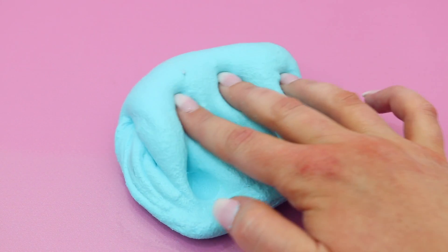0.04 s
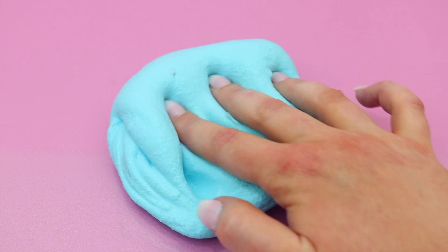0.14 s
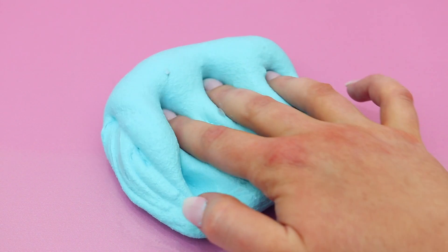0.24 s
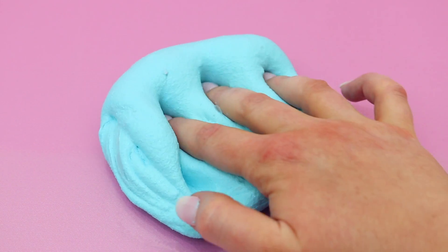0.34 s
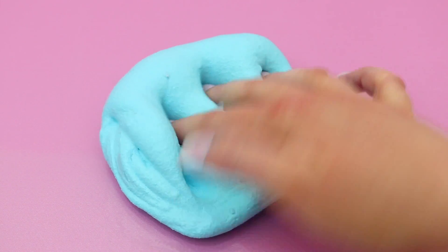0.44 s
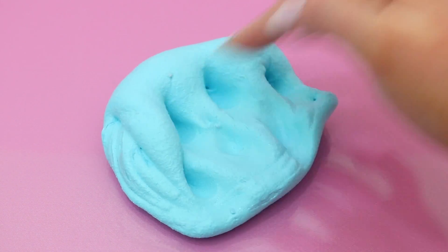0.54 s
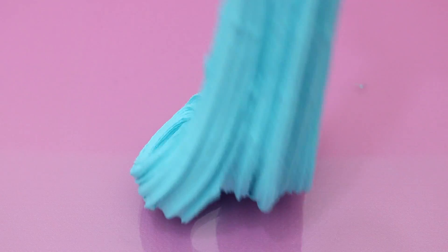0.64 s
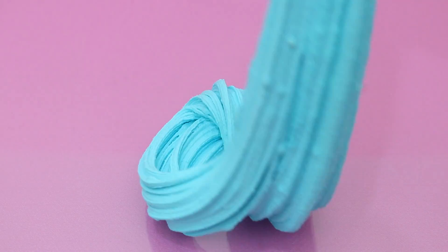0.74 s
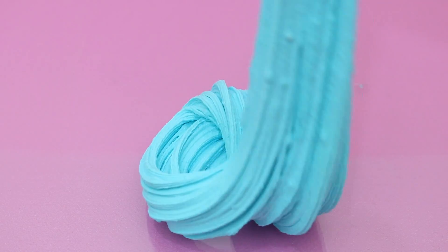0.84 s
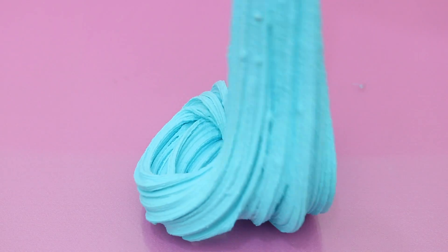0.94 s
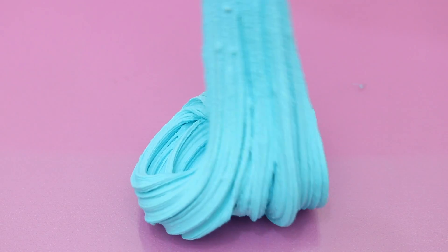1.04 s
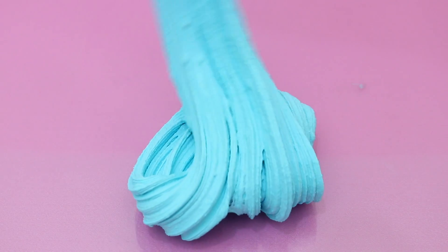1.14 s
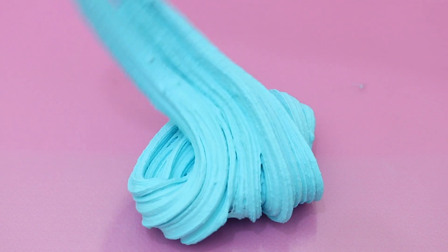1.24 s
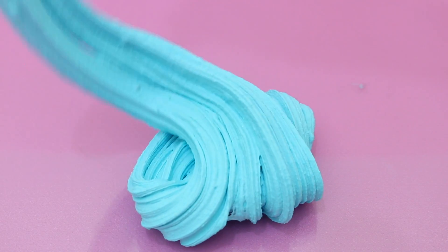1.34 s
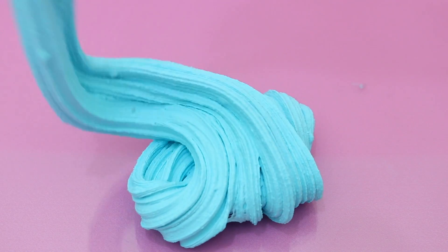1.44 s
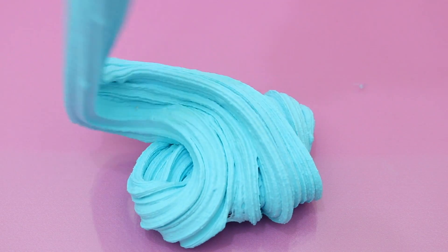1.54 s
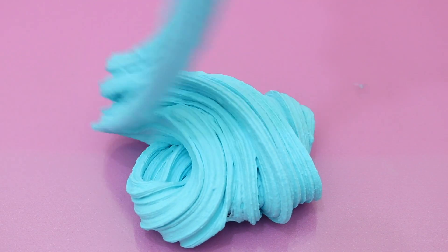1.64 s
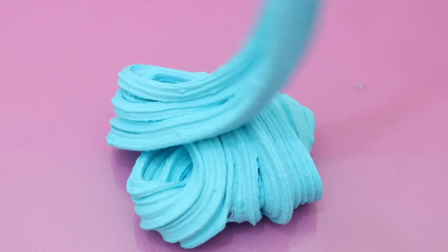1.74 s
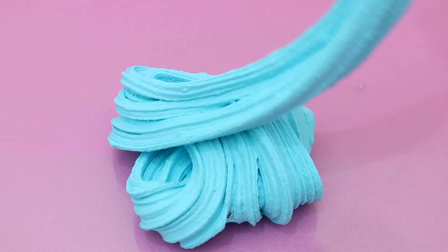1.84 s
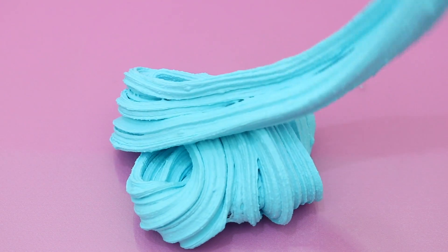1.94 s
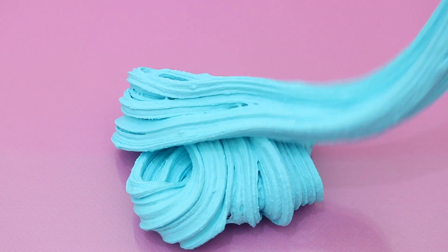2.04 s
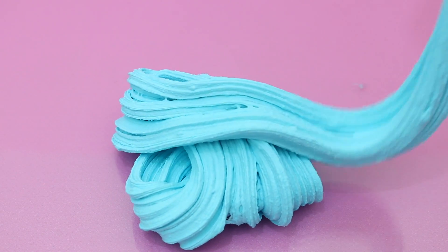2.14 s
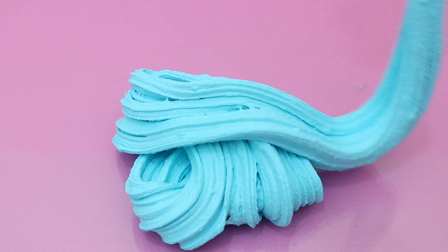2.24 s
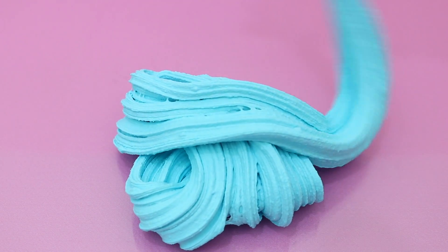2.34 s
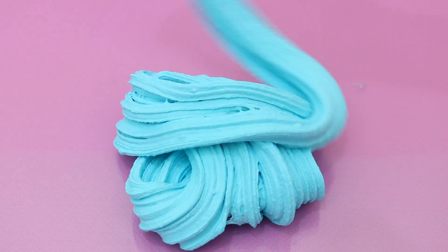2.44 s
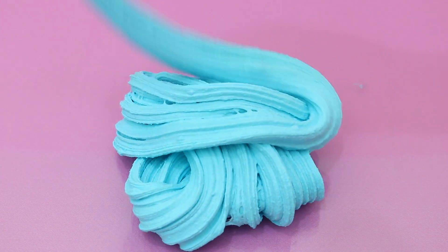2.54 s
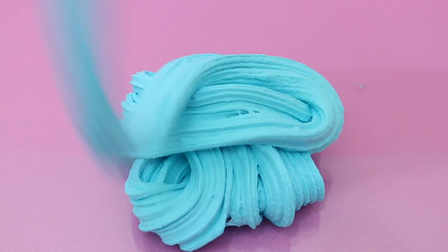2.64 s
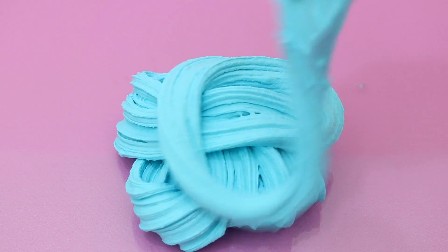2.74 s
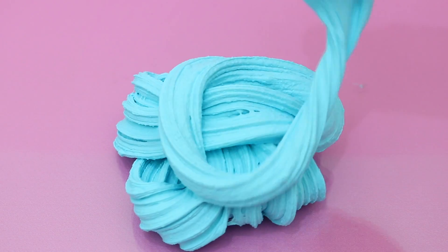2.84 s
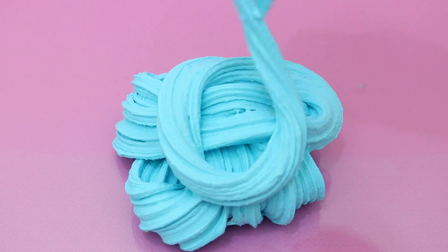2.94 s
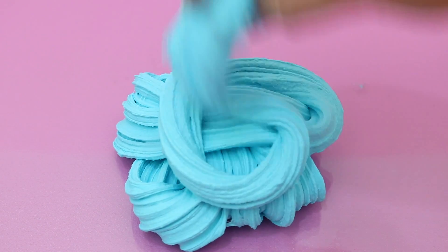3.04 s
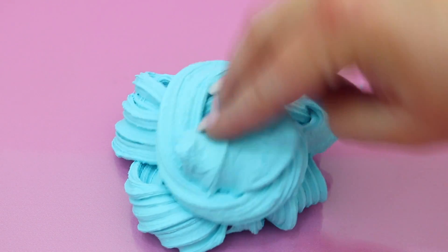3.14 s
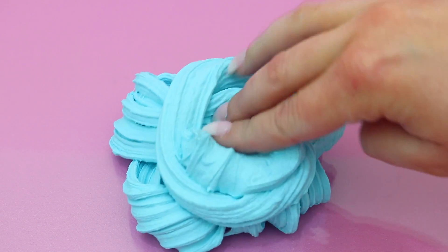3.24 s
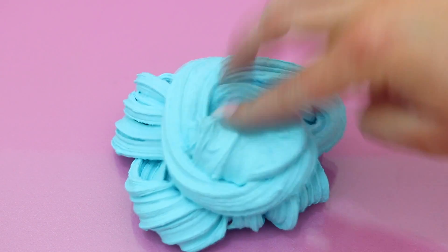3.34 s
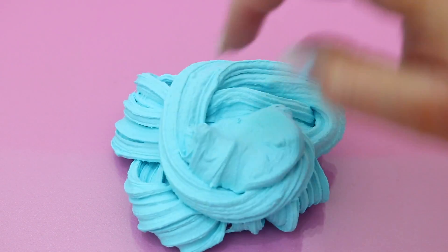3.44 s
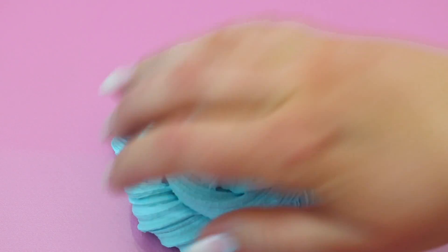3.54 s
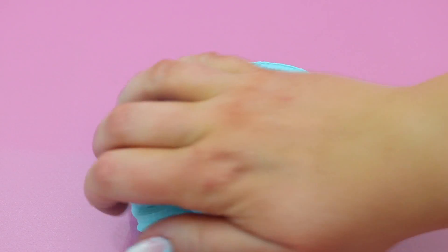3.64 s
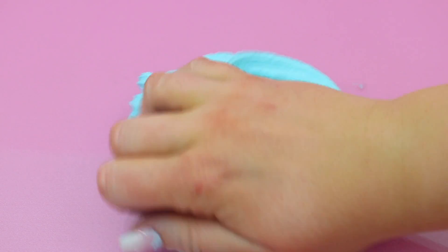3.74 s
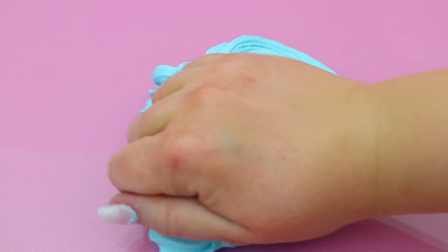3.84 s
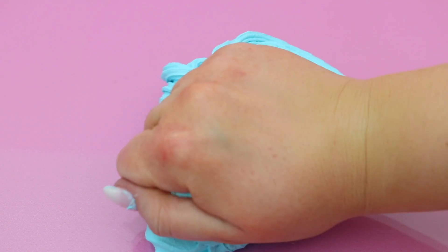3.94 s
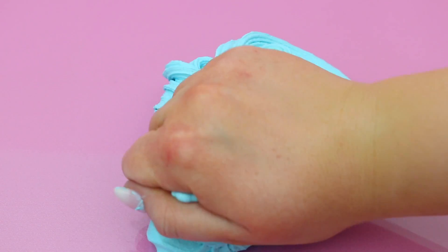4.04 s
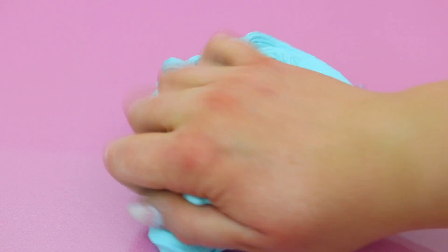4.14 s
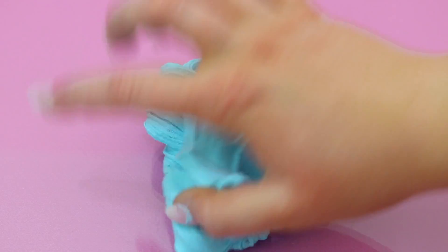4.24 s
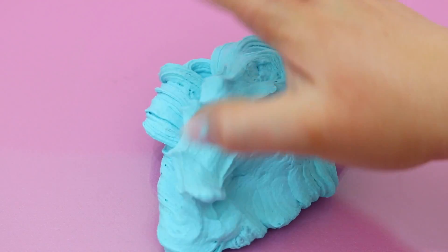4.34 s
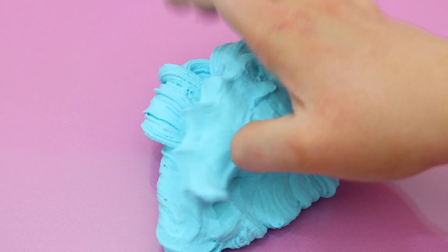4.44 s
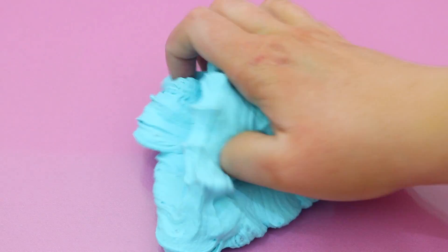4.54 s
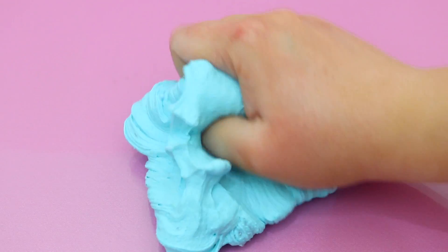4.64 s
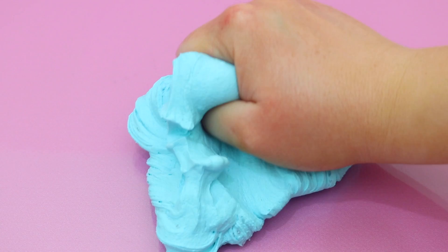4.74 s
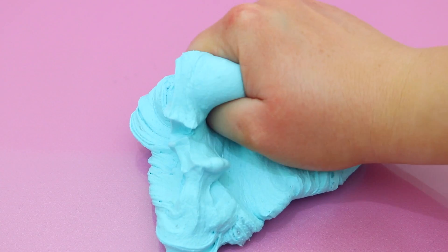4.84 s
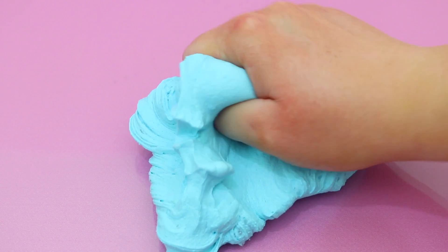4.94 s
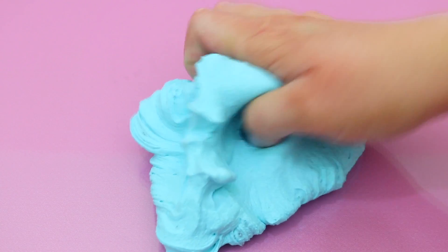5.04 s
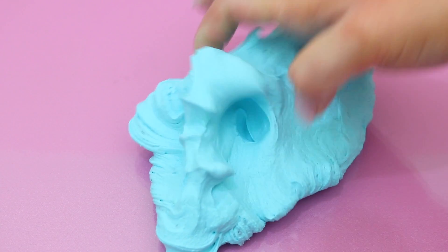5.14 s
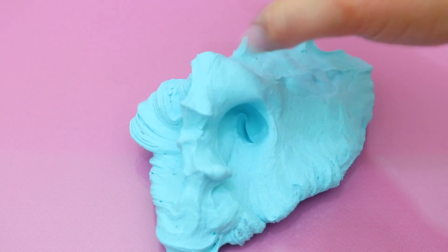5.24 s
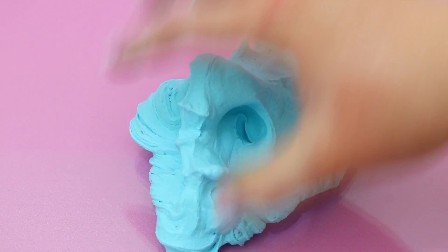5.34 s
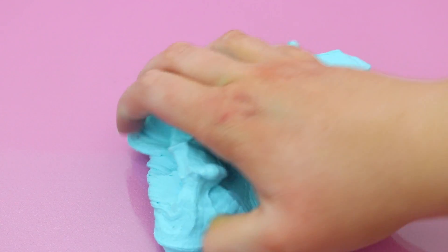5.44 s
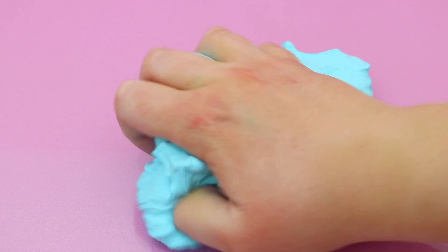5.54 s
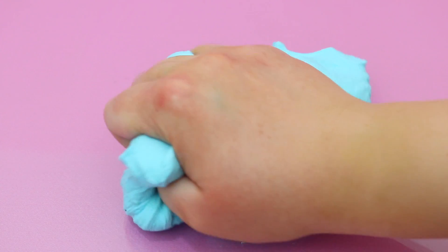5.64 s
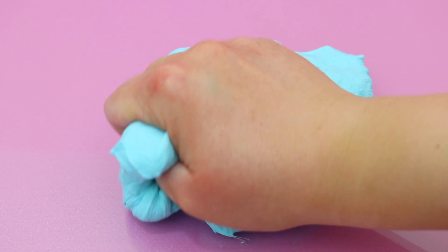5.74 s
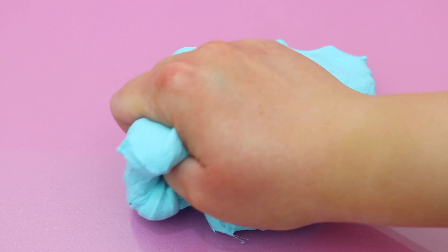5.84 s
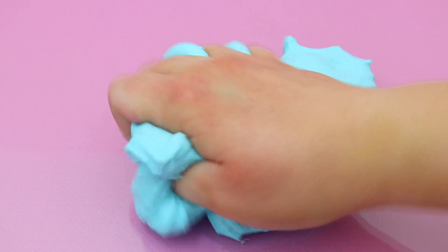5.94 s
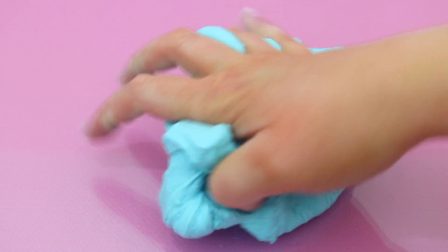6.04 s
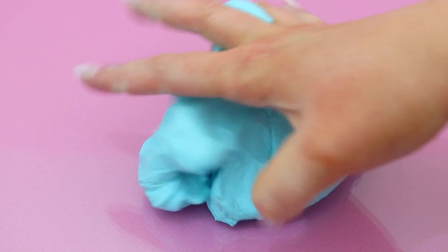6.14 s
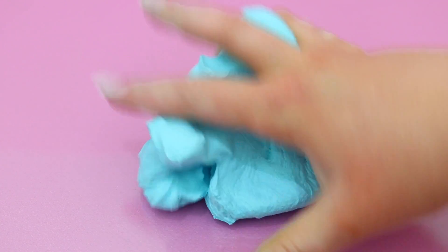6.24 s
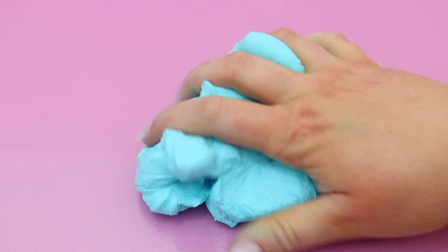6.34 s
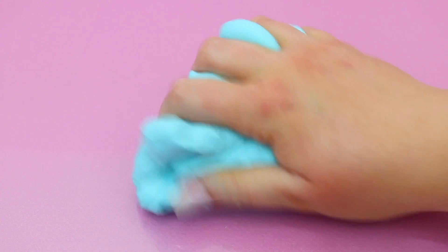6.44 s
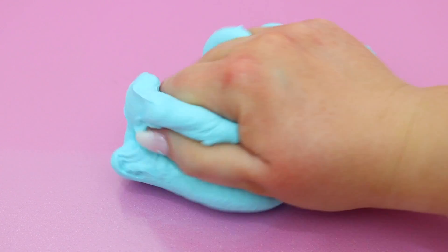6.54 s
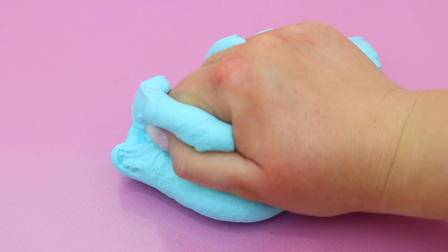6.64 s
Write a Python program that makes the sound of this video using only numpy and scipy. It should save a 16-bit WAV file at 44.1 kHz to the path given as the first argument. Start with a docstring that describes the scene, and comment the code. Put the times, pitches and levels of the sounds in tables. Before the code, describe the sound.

Foamy slime squeezed close up: sharp wet snaps, crackling bubbles and popping air pockets in bursts, with faint rustling folds between over quiet room hum.

```python
"""At a table in a small room, a hand pulls, folds and squeezes foamy slime close to a phone microphone.
Bubbles snap (short spikes with a sharp edge and a ring) and larger pockets pop (a few climbing cycles).
Squeezes and folds release a dense wet crackle, made of thousands of random damped sines.
Soft pushes ring the table's low modes, and noise that dies away makes the room's tail.
Underneath lie quiet air noise, a wavering hum and faint tones."""
import sys
import numpy as np
from scipy import signal
from scipy.fft import rfft, irfft, next_fast_len
from scipy.io import wavfile
from scipy.ndimage import map_coordinates

SR = 44100
rng = np.random.default_rng(int(sys.argv[2]) if len(sys.argv) > 2 else 0)


def dump(signal):
    """Clip the signal to [-1, 1] and save it as 16-bit WAV at the path in sys.argv[1]."""
    limited = np.clip(np.atleast_2d(signal).T, -1, 1)
    pcm = np.round(limited * 32767).astype(np.int16)
    wavfile.write(sys.argv[1], SR, pcm)


N = 295470

# The clearest bubbles bursting; many snaps are doubled by a close echo about 2 ms later.
# Levels and pitches are nominal:
# (time [s], level [dB], pitch [Hz], echo's level over the snap [dB])
BUBBLE_SNAPS = [(0.5277, -26, 10600, -20), (0.545, -20, 6550, -5), (0.5736, -29.5, 6140, -20),
                (0.5844, -25.5, 5670, -20), (1.415, -52.5, 5070, -20), (1.5672, -49.5, 4530, -20),
                (1.636, -46, 7000, -20), (1.647, -39, 6700, -22), (1.664, -37.5, 6590, 1.5),
                (1.7033, -48, 12700, -20), (1.7192, -37, 8000, -0.5), (1.7231, -42, 6940, -2),
                (2.0139, -46, 3900, -20), (2.0385, -45, 7400, -18), (2.043, -39.5, 9000, -3),
                (2.0595, -42, 6430, -20), (2.072, -43, 6570, -20), (2.173, -42, 3590, 1.5),
                (2.3552, -52, 5800, -20), (2.362, -51, 3820, -20), (2.4467, -55, 12300, -20),
                (2.611, -46.5, 3340, -20), (2.6644, -41.5, 5340, -6), (2.8288, -46, 7900, -20),
                (2.914, -52, 8700, -20), (2.9307, -42, 6560, -18), (3.066, -49, 6900, -20),
                (3.0988, -43.5, 5370, -20), (3.1987, -43.5, 6130, -20), (3.2944, -48.5, 5300, 1),
                (3.3719, -51, 4730, -20), (3.3974, -37, 4200, -17), (3.4015, -30, 6340, -20),
                (3.4211, -32, 9500, 4.5), (3.5925, -50, 4000, -20), (3.7932, -37, 7500, -20),
                (3.8213, -44, 3600, -20), (3.857, -24.5, 3970, -18), (3.859, -23.5, 7940, -20),
                (3.8705, -29, 10400, -20), (3.8826, -27, 6000, -20), (3.892, -20.5, 5550, -3),
                (3.9162, -14.5, 6500, 2.5), (3.937, -34, 9500, -20), (3.949, -31, 8000, -20),
                (3.9735, -10.5, 8900, -20), (3.9762, -24, 9800, -20), (3.9923, -16, 7000, -25),
                (4.0075, -28, 3750, -2), (4.1785, -29, 3480, -14), (4.2407, -29, 5050, -20),
                (4.3016, -39, 8800, -22), (4.316, -34, 6450, 1.5), (4.3331, -36, 8600, -20),
                (4.5966, -34, 3780, -14), (4.612, -45, 6600, 5), (4.6244, -33.5, 3900, -20),
                (4.6593, -39.5, 4260, 8), (4.6944, -30.5, 3530, -5), (4.698, -26, 5900, -20),
                (4.711, -30, 10200, -20), (4.7168, -10.5, 8800, -0.5), (4.7392, -29, 7700, 7),
                (4.7446, -9, 5200, 2.5), (4.761, -24, 11000, -20), (4.7754, -7, 10100, 4),
                (4.7876, -18, 8700, -20), (4.8194, -9.5, 5070, 4), (4.887, -11, 7050, -7.5),
                (4.908, -25, 7110, -21), (5.0345, -30, 4700, -4.5), (5.062, -21, 4600, 3.5),
                (5.0835, -17, 3800, -19), (5.1599, -29.5, 3170, -16.5), (5.236, -39, 3400, -15),
                (5.5265, -33, 7060, -23), (5.5337, -30, 6600, -23), (5.543, -35, 8600, -10),
                (5.554, -39, 3790, -0.5), (5.565, -43, 6670, -1), (5.5816, -38.5, 3590, -20),
                (5.592, -37, 6600, -20), (5.6239, -28, 9760, 2.5), (5.6293, -24, 11500, -20),
                (5.6408, -22, 9700, -20), (5.6552, -30.5, 3770, -1), (5.6589, -22.5, 8300, -3),
                (5.689, -26.5, 3930, -5), (5.7015, -21, 6850, -20), (5.708, -19.5, 2970, -18),
                (5.715, -18, 3340, -20), (5.7217, -15, 9240, -20), (5.7274, -15.5, 7170, -4.5),
                (5.7317, -22, 3130, -2), (5.7623, -26, 9700, -3.5), (5.783, -31, 2800, -24),
                (5.9758, -37.5, 9000, -20), (6.0133, -35, 5670, -20), (6.027, -38, 3527, -22),
                (6.0574, -26, 4330, 4), (6.0927, -15.5, 9000, -15.5), (6.313, -33.5, 7050, 0),
                (6.4294, -42.5, 4100, -1), (6.4358, -39.5, 6000, -4), (6.4587, -46.5, 3410, -20),
                (6.498, -40, 5870, 1.5), (6.5179, -27.5, 9300, -20), (6.5459, -22, 6500, -20),
                (6.5543, -21, 4500, -20), (6.563, -25, 2930, -20), (6.6032, -21.5, 5050, -3),
                (6.6077, -24.5, 3640, -4), (6.6633, -36.5, 9900, 4)]
# Large air pockets opening or closing under the fingers, nominal levels and pitches:
# (time [s], level [dB], pitch [Hz])
POCKET_POPS = [(0.5307, -32, 574), (0.5379, -31, 563), (0.5461, -28.5, 520), (0.554, -34, 626),
               (0.584, -29.5, 587), (2.0444, -43.5, 1140), (2.175, -45, 1460), (3.4273, -39, 622),
               (3.8534, -27.5, 940), (3.8944, -31, 1010), (3.9159, -24.5, 1310), (3.9734, -27.5, 1025),
               (3.994, -39, 793), (4.0071, -39, 1661), (4.185, -20.5, 1764), (4.1916, -16, 1522),
               (4.1972, -32, 1745), (4.2037, -39, 1500), (4.2106, -28.5, 1420), (4.221, -41, 1090),
               (4.2267, -21, 1500), (4.232, -22, 1550), (4.2382, -21, 1600), (4.717, -17.5, 630),
               (4.747, -45, 1410), (4.821, -43, 1610), (4.8908, -38, 1600), (5.038, -19.5, 630),
               (5.0475, -34, 840), (5.0613, -18, 595), (5.0769, -20.5, 670), (5.0804, -18.5, 1210),
               (5.088, -16.5, 1524), (5.1608, -29.5, 1454), (5.5822, -35.5, 710), (5.627, -30.5, 1520),
               (5.6552, -33, 1540), (5.6898, -21, 570), (5.7018, -20.5, 1070), (5.7068, -14.5, 1170),
               (5.7136, -18.5, 980), (5.7208, -11.5, 738), (5.7318, -15, 900), (5.7486, -17, 990),
               (5.7683, -30, 830), (5.7841, -18.5, 1185), (5.9763, -24.5, 965), (6.014, -20, 1290),
               (6.025, -17.5, 870), (6.0579, -22.5, 990), (6.0934, -24.5, 1199), (6.3136, -37.5, 1320),
               (6.4294, -37, 1270), (6.4583, -40, 1200), (6.5204, -33, 1380), (6.5329, -31.5, 1550),
               (6.5537, -12.5, 1233), (6.5623, -19, 1050), (6.5655, -21, 1000), (6.6007, -30, 822),
               (6.605, -19.5, 970), (6.612, -16, 620), (6.617, -19, 640), (6.644, -35, 1130)]
# How wet the slime under the fingers is:
# (time [s], level the squelch gains [dB], middle pitch of its large bubbles [Hz])
SLIME_WETNESS = [(0.55, 2, 640), (2, -2.5, 1100), (3.9, -3, 1100), (4.19, 1.5, 1700), (4.235, 4, 1500),
                 (4.72, -6, 810), (4.9, -4, 1500), (5.05, 0.5, 760), (5.12, 0.5, 1000), (5.6, -1, 1000),
                 (5.73, -0.5, 1100), (6.03, 3, 1000), (6.57, -1.5, 1200), (6.61, 2.5, 1100), (6.7, 6, 1250)]

SHARP_EDGE_HZ = 10140  # centre of the fizz; the sharp edges of snaps scatter around it


def amp(db):
    """Turn dB into gain."""
    return 10 ** (np.asarray(db) / 20)


def unit(x):
    """Scale a sound to an rms of 1."""
    return x / np.sqrt(np.mean(x ** 2) + 1e-20)


def along(points, hz):
    """Read (frequency [Hz], value) points between their entries, on a log frequency axis."""
    point_hz, value = np.transpose(points)
    return np.interp(np.log(hz + 1), np.log(point_hz + 1), value)


def curves(rows):
    """Give one value per sample for each column after the time."""
    s, *columns = np.transpose(rows)
    return [np.interp(np.arange(N) / SR, s, column) for column in columns]


def wobble(rate):
    """Draw a smooth random curve through `rate` random points a second."""
    points = rng.standard_normal(int(N * rate / SR) + 4)
    return map_coordinates(points, [np.arange(N) * rate / SR])


def filtered(x, response):
    """Multiply the spectrum of x by a response given as a function of frequency."""
    size = next_fast_len(N + SR)
    spectrum = rfft(x, size) * response(np.fft.rfftfreq(size, 1 / SR))
    return irfft(spectrum, size)[..., :N]


def resonance(hz, centre_hz, width_hz):
    """Response of one resonance, with a gain of 1 at its centre."""
    damping = 1j * hz * width_hz
    return damping / (centre_hz * centre_hz - hz * hz + damping)


def grains(s, gain, hz, cycles, rise, size, swell=0.49):
    """Damped sines: swell over `swell` cycles up to time s, decay 60 dB in `cycles`, climb with `rise`."""
    k = np.arange(size)
    turns = hz[:, None] * k / SR
    swelling = np.sin(np.pi / 2 * np.minimum(turns / swell, 1)) ** 2
    shape = swelling * amp(-60 * turns / cycles)
    wave = gain[:, None] * shape * np.sin(2 * np.pi * turns * (1 + rise * turns))
    at = np.round((s - swell / hz) * SR).astype(int)[:, None] + k
    # samples before the start or past the end land on the edges; the last bin is dropped
    return np.bincount(at.clip(0, N).ravel(), wave.ravel(), N + 1)[:N]


def swarm(count, mid_hz, spread, size_db, cycles, size):
    """Random bubbles of rms 1: pitches scatter around a moving centre, a few are much louder than the rest."""
    u, z = rng.random((count, 3)), rng.standard_normal(count)
    centre = mid_hz[(u[:, 0] * N).astype(int)]
    hz = np.clip(centre * np.exp(spread * z), 100, .4 * SR)
    sign = np.sign(u[:, 2] - .5)
    gain = amp(-size_db * np.log(u[:, 1] * .98 + .02)) * sign
    # higher bubbles are shorter: the root keeps the power of the swarm steady
    gain = gain * np.sqrt(centre)
    return unit(grains(u[:, 0] * N / SR, gain, hz, cycles, rise=0, size=size, swell=1.2))


def around(s, db, rise_s, fall_s):
    """Power that gathers before each event and dies after it, both exponentially."""
    t = np.arange(-SR // 4, SR // 4 + 1) / SR
    shape = np.exp(np.where(t < 0, t / rise_s, -t / fall_s))
    marks = np.bincount(np.round(s * SR).astype(int), amp(2 * db), N)
    return np.abs(signal.fftconvolve(marks, shape, "same"))


def background():
    """Shaped noise for the air, plus a hum and faint tones whose pitch and level waver."""
    # Hum and air through time, levels before they waver:
    # (time [s], hum pitch [Hz], hum level [dB], air level [dB])
    floor_curve = [(0, 178.4, -65, -62), (.45, 178, -65.5, -62.5), (.7, 175.4, -66, -61.5),
                   (.76, 200, -68.5, -67), (3, 198.3, -71, -68), (3.1, 198.7, -77.5, -69.5),
                   (3.3, 199.5, -72.5, -66), (4, 199.3, -77, -67), (6.7, 200, -74, -66.5)]
    # Colour of the air noise: (frequency [Hz], relative level [dB])
    air_colour = [(15, -37), (25, -13), (100, -1), (270, -2.5), (400, -7.5), (550, -11), (800, -13),
                  (1200, -10), (1800, -17), (2200, -22), (2700, -25.5), (6000, -29.5), (16000, -54)]
    # Faint tones, nominal: (frequency [Hz], level [dB])
    faint_tones = [(102, -85), (134, -101), (265, -76.5), (355, -77.5)]

    hum_hz, hum_db, air_db = curves(floor_curve)
    air = unit(filtered(rng.standard_normal(N), lambda hz: amp(along(air_colour, hz))))
    air = amp(air_db + 0.93 * wobble(15.0)) * air

    hum_gain = amp(hum_db + 3 + 2.4 * wobble(16.0))  # 3 dB: from rms to peak of a sine
    hum = hum_gain * np.sin(2 * np.pi * np.cumsum(hum_hz + 1.15 * wobble(8.1)) / SR)

    tones = np.zeros(N)
    for hz, db in faint_tones:
        tone_gain = amp(db - 1.5 + 3.9 * wobble(7.6))
        tones += tone_gain * np.sin(2 * np.pi * np.cumsum(hz + 1.48 * wobble(8.4)) / SR)
    return air + hum + tones


def room(x):
    """Echoes as a noise tail in which each frequency dies at its own speed, redrawn every 1/8 s."""
    # How long the room rings: (frequency [Hz], time to fall 60 dB [s])
    decay_times = [(200, 0.38), (1400, 0.18), (3700, 0.36), (10000, 0.22)]
    delay = 90  # samples, about 2 ms
    out, step = np.zeros(N + SR), SR // 8
    for start in range(0, N, step):
        hz, t, z = signal.stft(rng.standard_normal(SR // 2), SR, nperseg=128)
        decay = amp(-60 * t / along(decay_times, hz)[:, None])
        tail = signal.istft(z * decay, SR, nperseg=128)[1]
        wet = signal.fftconvolve(x[start:start + step], tail / np.linalg.norm(tail))
        out[start + delay:][:len(wet)] += wet
    # soft walls swallow the treble
    return filtered(out[:N], lambda hz: 1 / (1 + 1j * hz / 5000))


def thuds():
    """The hand jolts the table through the slime: each soft push sets the table's low modes ringing."""
    # The pushes, levels before the boost and the table: (time [s], level [dB], push pitch [Hz])
    push_list = [(0.548, -43, 196.7), (1.7, -53, 89), (3.431, -52, 120), (3.855, -46, 197),
                 (4.221, -38.5, 112), (4.23, -41.5, 285), (4.715, -55, 280), (5.036, -38.5, 282),
                 (5.063, -37, 131.5), (5.081, -37, 280), (5.726, -27.5, 278), (6.022, -38, 215),
                 (6.091, -45, 280), (6.351, -53, 109.2), (6.551, -63.5, 280), (6.61, -51, 298)]
    # Low modes of the table: (frequency [Hz], width [Hz], level [dB])
    table_modes = [(58.6, 28, -13.5), (119.8, 13.5, -4), (203, 42, -5.5), (269, 18, 3.5), (337, 13, -1.5)]

    s, db, hz = np.transpose(push_list)
    pushes = grains(s, amp(db + 18), hz, cycles=4.54, rise=0, size=2000, swell=0.87)

    def wood(hz):
        """Sum of the table's modes, with alternating signs."""
        return sum((-1) ** k * amp(mode_db) * resonance(hz, centre, width)
                   for k, (centre, width, mode_db) in enumerate(table_modes))

    return filtered(pushes, wood)


def squeezing_db():
    """The crackle level of all squeezes, joined into one curve."""
    # One list for each squeeze or release of the hand, relative levels: (time [s], level [dB])
    squeeze_list = [
        [(0.45, -87), (0.48, -62.5), (0.51, -57), (0.523, -48.5), (0.544, -46.5), (0.585, -59), (0.68, -82)],
        [(3.74, -80), (3.8, -60.5), (3.847, -59.5), (3.86, -43), (3.882, -50), (3.924, -45), (4.004, -50),
         (4.078, -67)],
        [(4.135, -66), (4.14, -59), (4.168, -58), (4.189, -45), (4.231, -43), (4.288, -56.5), (4.325, -50),
         (4.363, -73.5), (4.45, -85)],
        [(4.589, -81.5), (4.604, -67.5), (4.657, -63.5), (4.724, -43), (4.785, -36), (4.808, -42),
         (4.912, -47.5), (4.991, -61.5)],
        [(5.026, -54), (5.042, -42.5), (5.056, -48.5), (5.085, -36), (5.117, -53), (5.157, -44), (5.182, -58),
         (5.233, -57.5), (5.273, -80)],
        [(5.52, -75), (5.532, -54), (5.6, -57.5), (5.629, -46.5), (5.683, -50.5), (5.697, -40.5), (5.719, -37),
         (5.78, -51), (5.932, -72)],
        [(5.95, -63), (5.972, -61), (5.984, -48), (6.02, -40.5), (6.043, -46.5), (6.098, -43), (6.122, -52.5),
         (6.228, -60.5), (6.293, -80)],
        [(6.421, -77), (6.492, -57), (6.532, -49.5), (6.554, -33), (6.585, -52), (6.61, -38.5), (6.645, -58.5),
         (6.7, -68.5)],
    ]
    rows = [(0.0027, -91)] + [row for squeeze in squeeze_list for row in squeeze]
    return curves(rows)[0]


def squeezes():
    """Countless small bubbles: fine crackle and finer fizz in clumps, over a duller squelch."""
    # The stretched strand rustles as it folds onto the heap, relative levels: (time [s], level [dB])
    fold_list = [(1.655, -59.5), (1.72, -60.5), (2.06, -54.5), (2.18, -64), (2.355, -60), (2.512, -64.5),
                 (2.61, -69.5), (2.925, -59.5), (3.1, -63.5), (3.215, -64), (3.3, -62.5), (3.405, -53.5)]
    squelch_db, fold_squelch_db = -12.5, -6  # squelch relative to the crackle of a squeeze or fold
    ooze_power = amp(2 * -76.5)  # faint steady oozing

    snap_s, snap_db = np.transpose(BUBBLE_SNAPS)[:2]
    pop_s, pop_db = np.transpose(POCKET_POPS)[:2]

    # power of the fine crackle: squeezes, folds and a spray around each snap
    pressed = amp(2 * squeezing_db())
    folds = around(*np.transpose(fold_list), rise_s=0.011, fall_s=0.0095)
    spray_db = -62 + .5 * (snap_db + 36.5)  # grows half as fast as the snap, in dB
    fine = pressed + folds + around(snap_s, spray_db, rise_s=0.002, fall_s=0.0089)

    # power of the dull squelch, with a gush around each pop
    gush = around(pop_s, pop_db - 21.5, rise_s=.003, fall_s=.008)
    dull = amp(2 * squelch_db) * pressed + amp(2 * fold_squelch_db) * folds + ooze_power + gush
    wetness_db, large_hz = curves(SLIME_WETNESS)
    dull = dull * amp(2 * wetness_db)

    # how far the squelch outweighs the crackle: it lifts the crackle's pitch and drowns the fizz
    wet_db = np.clip(10 * np.log10(dull / (fine + ooze_power)), -15, 10)
    small_hz, follows = 5250, .5  # crackle pitch leans to that of the nearest snaps
    small_hz = small_hz * (curves(BUBBLE_SNAPS)[1] / small_hz) ** follows
    small_hz = small_hz * 2 ** (0.06 * wet_db)  # octaves per dB
    fizz_gain = amp(-8.5 - 0.34 * wet_db)

    crackle = swarm(count=20000, mid_hz=small_hz, spread=0.46, size_db=0.5, cycles=11.0, size=100)
    fizz = swarm(count=16000, mid_hz=np.full(N, SHARP_EDGE_HZ), spread=0.15, size_db=4.5, cycles=15.0, size=40)
    squelch = swarm(count=10000, mid_hz=large_hz, spread=0.47, size_db=2.5, cycles=7, size=500)

    # wavering levels gather the bubbles into clumps
    crackle = np.sqrt(fine) * amp(-4.5 + 2.85 * wobble(70)) * (crackle + fizz_gain * fizz)
    squelch = np.sqrt(dull) * amp(1.93 * wobble(50)) * squelch
    return crackle + squelch


def pops():
    """A pocket opens: a few cycles that climb as the hole widens, with an overtone."""
    s, db, hz = np.transpose(POCKET_POPS)
    sign = np.sign(rng.random(len(s)) - .5)
    main = grains(s, sign * amp(db - 2.0), 0.77 * hz, cycles=5.2, rise=0.06, size=700)
    overtone = grains(s, sign * amp(db - 5.5), 1.57 * hz, cycles=6.8, rise=0, size=400)
    return main + overtone


def all_snaps(count=80):
    """Listed snaps, their close echoes, and lesser stray ones that crowd where the crackle is strong."""
    echo_s = 0.0021  # delay after the snap
    s, db, hz, echo_db = np.transpose(BUBBLE_SNAPS)
    level_db = squeezing_db()
    crowd = np.cumsum(amp(level_db / 2))
    at = np.searchsorted(crowd, crowd[-1] * rng.random(count)).clip(0, N - 1)
    z = rng.standard_normal((count, 2))
    stray_db = level_db[at] + 11.5 + 2.5 * z[:, 0]
    stray_hz = 5230 * np.exp(0.39 * z[:, 1])
    return (np.r_[s, s + echo_s, at / SR],
            np.r_[db, db + echo_db, stray_db],
            np.r_[hz, hz, stray_hz])


def snaps():
    """A film bursts: a spike with a sharp edge and a loose shred, then a short ring, stronger for duller spikes."""
    ring_hz = 3754  # the rings scatter just around and below this
    s, db, hz = all_snaps()
    u = rng.random((len(s), 5))
    sign = np.sign(u[:, 0] - .5)

    # brighter spikes are sharper, up to a limit; wetness softens the edge
    edge_db = np.minimum(-6.5 + 3 * np.log2(hz / 6000), -2.5)
    wetness_db = np.interp(s, *np.transpose(SLIME_WETNESS)[:2])
    edge_db = edge_db - 0.496 * wetness_db + 2 * rng.standard_normal(len(s))

    # the softer the edge, the longer and more pitched the spike
    spike_cycles = 3 - 0.4 * edge_db[:, None]
    spike = grains(s, sign * amp(db + 2.5), 0.9 * hz, cycles=spike_cycles, rise=0, size=128)
    edge_hz = SHARP_EDGE_HZ * (0.91 + 0.36 * u[:, 4])
    edge = grains(s, sign * amp(db + edge_db + 6), edge_hz, cycles=6.5, rise=0, size=48)
    body = grains(s, sign * amp(db - 13), 0.36 * hz, cycles=3.8, rise=0, size=160)

    # the shred follows 0.3 to 0.6 ms later
    shred_s, shred_hz = s + .0003 * (1 + u[:, 1]), hz * (.6 + 0.67 * u[:, 2])
    shred = grains(shred_s, amp(db - 5.0), shred_hz, cycles=5.3, rise=0, size=128)
    ring_db = db - 13.5 - 9 * np.log2(hz / ring_hz)
    ring = grains(s, sign * amp(ring_db), ring_hz * (0.932 + 0.072 * u[:, 3]), cycles=30, rise=0, size=500)
    return spike + edge + body + shred + ring


def scene():
    """The slime, its table and room, and the background."""
    slime = snaps() + pops() + squeezes()
    # so small a source radiates little bass
    slime = filtered(slime, lambda hz: (1j * hz / (120 + 1j * hz)) ** 2)
    slime = slime + thuds()
    return (slime + amp(-10.0) * room(slime) + background())[None]


def record(dry):
    """Microphone resonances colour the sound; a flat, faint hiss lies over it, and it ends at a top frequency."""
    # Microphone resonances: (frequency [Hz], width [Hz], gain at the centre [dB])
    mic_resonances = [(1590, 275, 3), (3710, 146, 2), (5000, 3200, -2.5)]
    hiss_top_hz, top_hz = 15900, 16800

    def colour(hz):
        """The direct sound plus what each resonance adds or takes away."""
        return 1 + sum((amp(db) - 1) * resonance(hz, centre, width) for centre, width, db in mic_resonances)

    hiss = unit(filtered(rng.standard_normal(N), lambda hz: (hz < hiss_top_hz) * 1.))
    heard = filtered(dry, colour) + amp(-73.5) * hiss
    return filtered(heard, lambda hz: hz < top_hz)


dry = scene()
out = record(dry)
dump(out)
```